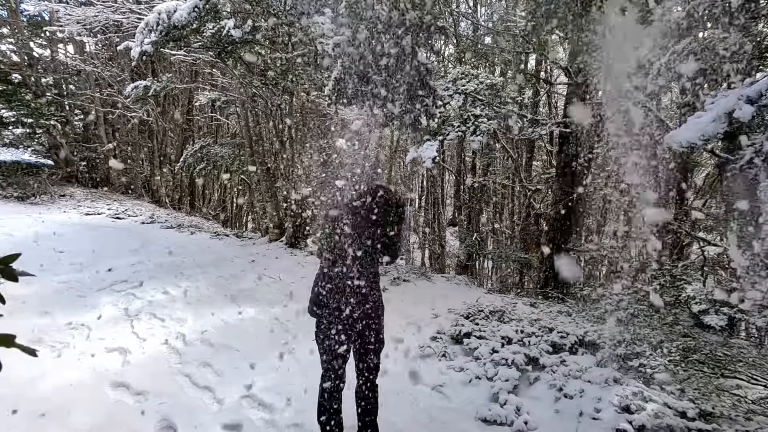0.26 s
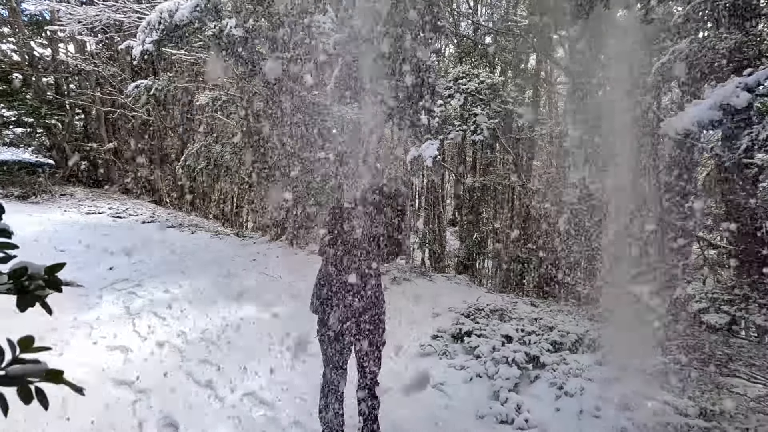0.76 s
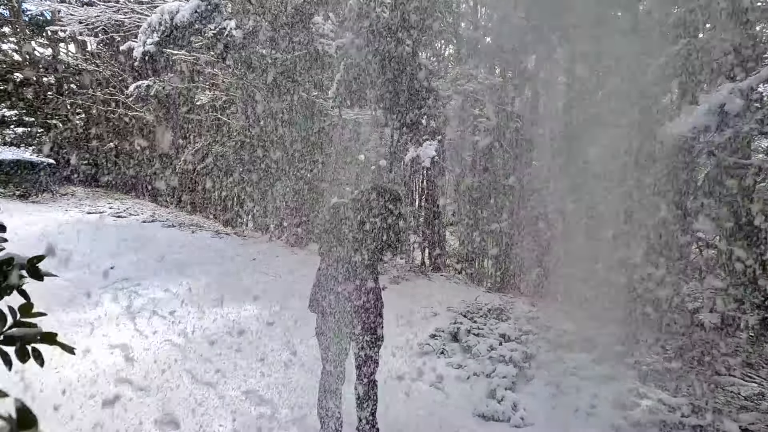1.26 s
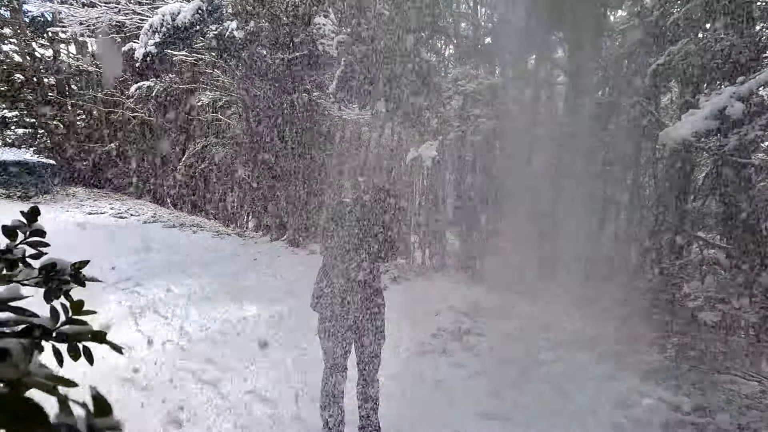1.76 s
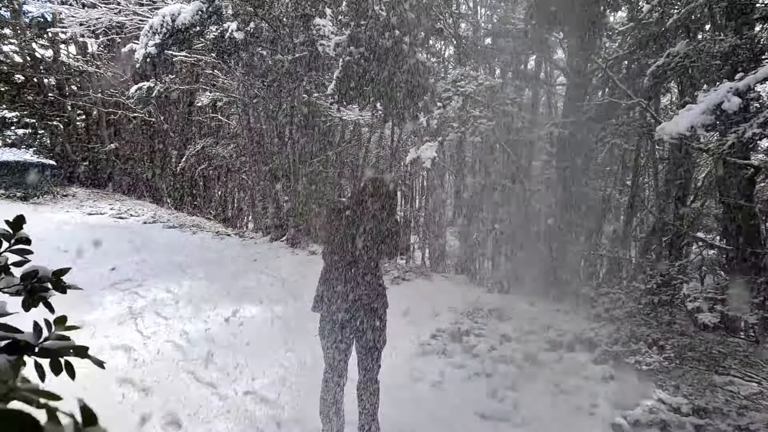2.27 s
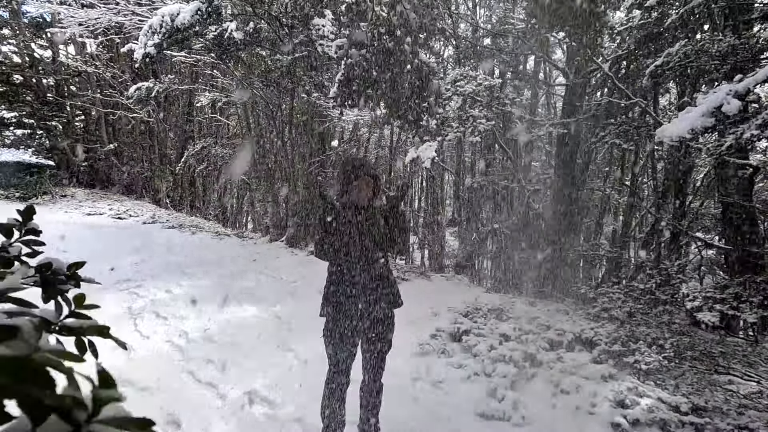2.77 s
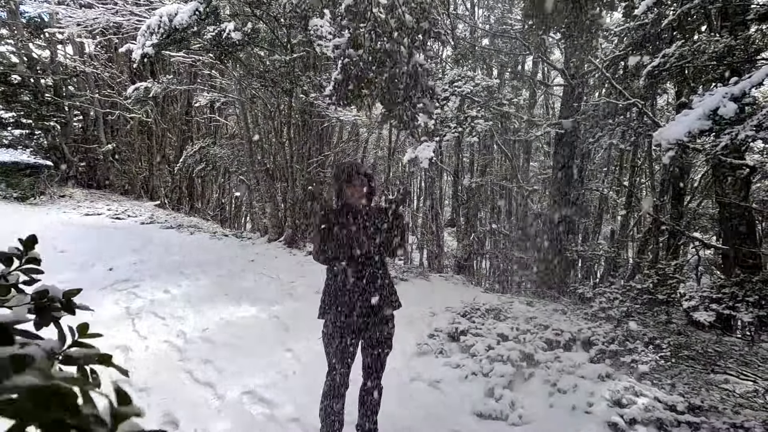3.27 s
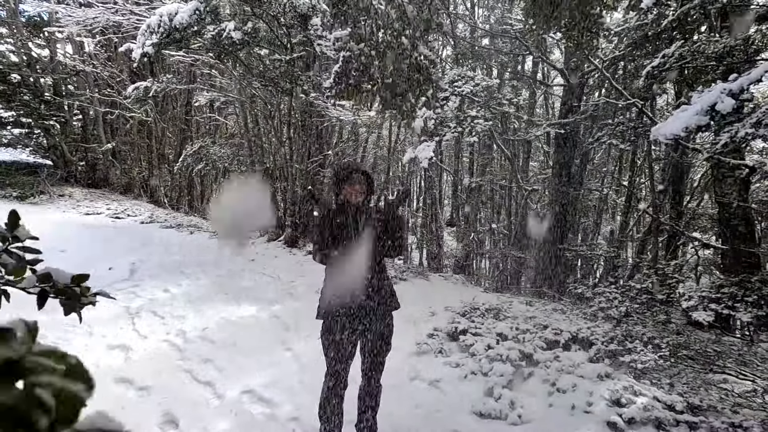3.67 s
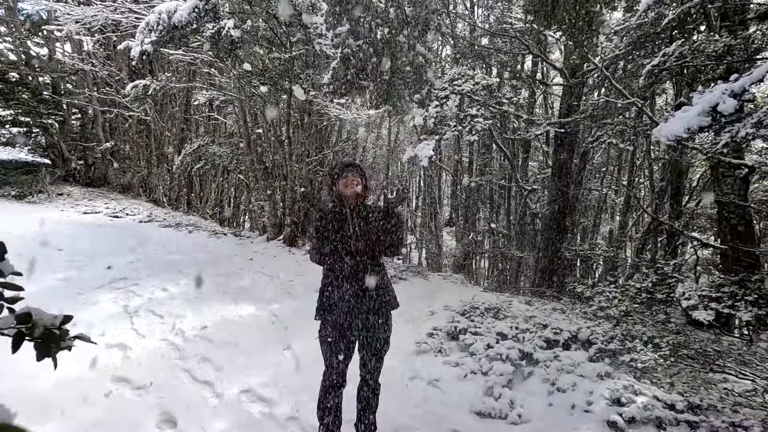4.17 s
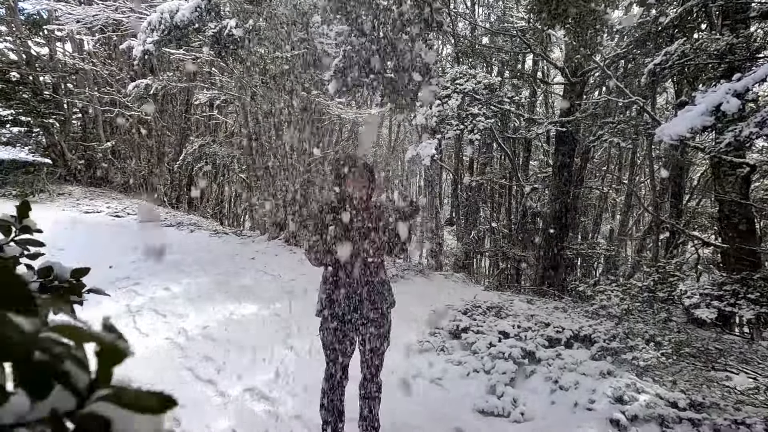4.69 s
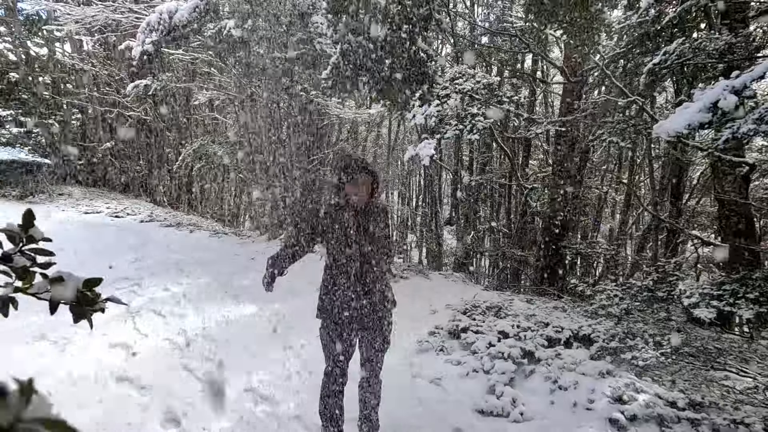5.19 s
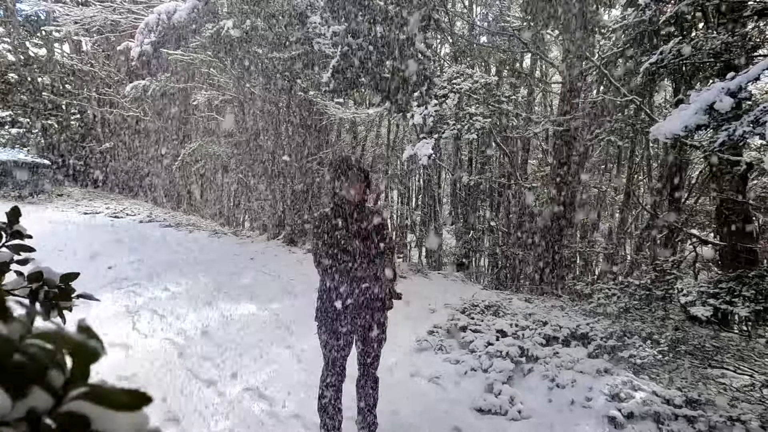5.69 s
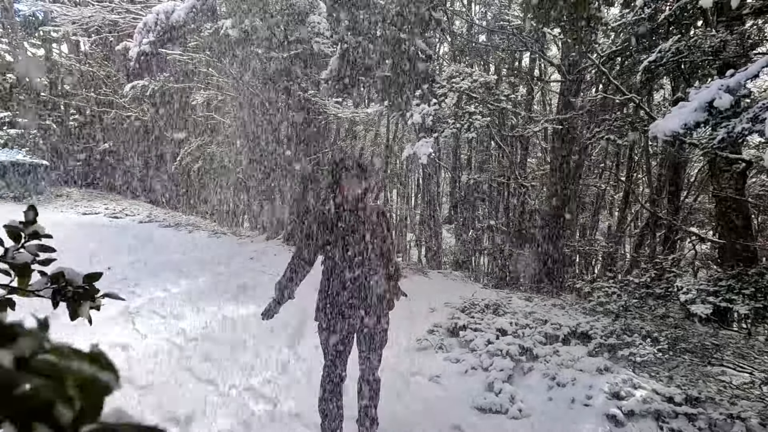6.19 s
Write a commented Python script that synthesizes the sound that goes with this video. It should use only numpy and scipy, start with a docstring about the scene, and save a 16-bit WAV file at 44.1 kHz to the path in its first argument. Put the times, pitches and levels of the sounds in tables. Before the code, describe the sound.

Loose snow slides from laden trees in a quiet forest around a handheld camera. A steady, wide, grainy hiss runs throughout, with faint crackle and dull drumming on the snow cover. Fine grains patter on the camera, a bright icy tick stands out early, powder swishes past, and soft clumps pat down. Later the fall thickens, ending with swishes and two crunchy bursts close by.

```python
"""Snow sliding off laden trees in a forest

Snow showers down around a hand-held camera. Countless crumbs on twigs and ground are random impulse trains,
coloured into a hiss, dry snaps and a dull drumming; powder swishes down in short swells of dense impacts.
Icy grains tick by exciting the casing's resonances, soft clumps pat and burst as damped, band-limited noise,
and the falling snow pushes air over the microphone ports as a low rumble and single pressure swings."""
import sys
import numpy as np
from scipy import signal
from scipy.fft import rfft, irfft, next_fast_len
from scipy.io import wavfile
from scipy.ndimage import uniform_filter1d, map_coordinates

SR = 44100
rng = np.random.default_rng(int(sys.argv[2]) if len(sys.argv) > 2 else 0)


def file_out(sig):
    """Save sig as 16-bit WAV at sys.argv[1]."""
    # one column per channel
    cols = np.atleast_2d(sig).T
    # limit, then scale
    lim = np.clip(cols, -1, 1)
    pcm = np.round(lim * 32767).astype(np.int16)
    wavfile.write(sys.argv[1], SR, pcm)


N = 284312

# Spectrum of snow crumbs striking twigs and snow. Each row: frequency in Hz, relative density in dB per Hz.
CRUMB_SPECTRUM = [(500, -18), (700, -11), (860, -12.5), (1050, -1), (1380, 0.5), (1800, 0), (2500, 0),
                  (3400, 0.5), (4600, -2), (6200, -2.5), (7700, -2), (9000, -9), (10500, -15), (12000, -13),
                  (15800, -33)]


def amp(db):
    """Decibels are logarithmic: 20 dB make a tenfold amplitude gain."""
    return 10 ** (np.asarray(db) / 20)


def unit(x):
    """Normalisation by the root of the mean power, to rms 1."""
    return x / np.sqrt(np.mean(x ** 2) + 1e-20)


def along(points, hz):
    """Interpolation of (Hz, value) points on a logarithmic frequency axis."""
    f, v = np.transpose(points)
    return np.interp(np.log(hz + 1), np.log(f + 1), v)


def curves(rows):
    """Linear interpolation in time: one value per sample for each column after the seconds."""
    s, *columns = np.transpose(rows)
    return [np.interp(np.arange(N) / SR, s, column) for column in columns]


def wobble(rate):
    """Slow random fluctuation: a smooth curve through `rate` random knots a second."""
    knots = rng.standard_normal(int(N * rate / SR) + 4)
    return map_coordinates(knots, [np.arange(N) * rate / SR])


def filtered(x, response):
    """Linear filtering: the spectrum of x times a complex response of frequency."""
    n = x.shape[-1]
    m = next_fast_len(n + 4096)  # zero padding leaves room for the ringing
    return irfft(rfft(x, m) * response(np.fft.rfftfreq(m, 1 / SR)), m)[..., :n]


def resonance(f, hz, width):
    """Response of one damped oscillator, causal and of gain 1 at its pitch."""
    return 1j * f * width / (hz * hz - f * f + 1j * f * width)


def casing(f):
    """Modal sum: the shell and ports ring briefly, and the stiff shell passes little below its first mode."""
    # Modes of the casing. Each row: frequency in Hz, bandwidth in Hz, relative level in dB.
    mode_table = [(3030, 610, -7.5), (5560, 940, -3), (7470, 1090, 0.5), (11200, 1460, -12.5),
                  (11880, 560, -6)]
    modes = 0
    for k, (hz, width, db) in enumerate(mode_table):
        modes = modes + (-1) ** k * amp(db) * resonance(f, hz, width)  # neighbours in opposite phase
    return modes * amp(along([(1500, -9), (2400, -6), (3100, 0)], f))


def pan(lean_db):
    """Constant-power panning: left and right gains for a left-right level difference in dB."""
    gains = amp(np.array([np.atleast_1d(lean_db), -np.atleast_1d(lean_db)]) / 2)
    return gains / np.sqrt(np.mean(gains ** 2, axis=0))


def right_port(f, edge_hz=8800):
    """Low-pass response of the ports: the left passes all the treble, the right rolls off."""
    return np.array([np.ones_like(f), 1 / np.sqrt(1 + (f / edge_hz) ** 12)])


def add(out, s, x):
    """Superposition: mix x into out from time s on."""
    i = max(round(s * SR), 0)
    out[:, i:i + x.shape[1]] += x[:, :max(N - i, 0)]


def impacts(rate, spread_db, life):
    """Random impulse trains, two unrelated: each impact is a decaying noise burst of log-normal size; rms 1."""
    sizes = amp(spread_db * np.clip(rng.standard_normal((2, N)), -2.5, 2.5))
    strikes = (rng.random((2, N)) < rate / SR) * sizes ** 2
    # the amplitude falls to 1/e within `life` seconds, so the energy falls twice as fast
    energy = signal.lfilter([1], [1, -np.exp(-2 / (life * SR))], strikes)
    return unit(np.sqrt(energy) * rng.standard_normal((2, N)))


def spread(pair, spectrum):
    """Interchannel coherence: colour two unrelated signals and blend them into a wide stereo field of rms 1."""
    # Likeness of the ports. Each row: frequency in Hz, left-right correlation before the level lean.
    likeness = [(100, 0.74), (500, 0.51), (1300, 0.65), (3000, 0.52), (7000, 0.8), (12000, 0.56)]
    # The right port is duller. Each row: frequency in Hz, left-right level difference in dB.
    port_lean = [(200, -4), (700, 1.5), (1300, 2.5), (2400, 2), (4400, 1.5), (8000, 1), (10000, 8.5),
                 (12000, 14)]

    def mid_side(f):
        turn = np.arccos(np.clip(along(likeness, f), -1, 1)) / 2
        return amp(along(spectrum, f)) * np.array([np.cos(turn), np.sin(turn)])

    mid, side = filtered(pair, mid_side)
    stereo = np.array([mid + side, mid - side])
    return unit(filtered(stereo, lambda f: pan(along(port_lean, f))))


def patchy(pair, depth_db):
    """Time-frequency modulation: smooth random gain patches give each gush its own colour."""
    z = signal.stft(pair, nperseg=512)[2]
    field = rng.standard_normal(z.shape[1:])
    field = uniform_filter1d(field, size=24, axis=0)  # over frequency bins
    field = uniform_filter1d(field, size=8, axis=1)  # over time frames
    return signal.istft(z * amp(depth_db * unit(field)), nperseg=512)[1][:, :N]


def air():
    """Pseudo-sound of moving air: a gusty draught rumbles on the ports, each puff swings from suction to pressure."""
    # Air dragged along by the falling snow. Each row: time in seconds, relative level in dB.
    draught = [(0.0, -52), (0.97, -61), (1.11, -56.5), (1.56, -66), (1.98, -51.5), (2.48, -60.5),
               (3.95, -56), (4.63, -54.5), (5.19, -56), (5.66, -50), (6.05, -62), (6.45, -50)]
    # Rumble of the draught. Each row: frequency in Hz, relative density in dB per Hz.
    rumble_spectrum = [(4, -67), (12, 9.5), (22, -17), (40, -16.5), (70, -33.5), (140, -58), (400, -90)]
    # Air pushed over the ports. Each row: time of the swing in seconds, relative level in dB, swing rate in Hz.
    puffs = [(0.651, -37, 21.7), (0.98, -34.5, 25.5), (2.071, -46.5, 30.2), (3.755, -39, 22.6),
             (3.96, -39.5, 40), (4.389, -38, 55), (4.453, -37, 32), (4.92, -29.5, 48.2)]
    gain_db, eddy_db = 6.5, 2  # rumble over the draught's level; its random swells
    draught_db, = curves(draught)
    rumble = spread(rng.standard_normal((2, N)), rumble_spectrum)
    out = rumble * amp(draught_db + gain_db + eddy_db * wobble(6))
    port_delay_s = np.array([[0], [0.001]])  # the air reaches the right port later
    for s, db, hz in puffs:
        u = 2 * np.pi * hz * (np.arange(N) / SR - s - port_delay_s)
        out += amp(db + 6) * u / (1 + u * u / 6) ** 3 * pan(-4.5)
    return out


def drumming(fall_db):
    """Power addition, in dB: the drumming on the ground follows the shower, and each slump swells over it."""
    # Heavy loads slumping onto the ground further off.
    # Each row: time of the peak in seconds, level in dB, half length in seconds.
    slumps = [(1.843, -68, 0.056), (2.736, -67, 0.1), (4.277, -72, 0.3), (5.318, -56.5, 0.025),
              (5.836, -60.5, 0.062)]
    ground_db, grows = -71, 0.26  # level at the shower's mean strength; dB per dB of shower
    t = np.arange(N) / SR
    power = amp(ground_db + grows * (fall_db - np.mean(fall_db))) ** 2
    for s, db, half in slumps:
        power = power + amp(db) ** 2 * np.exp(-((t - s) / half) ** 2)
    return 10 * np.log10(power)


def shower(hiss_db, ground_db):
    """Superposed impacts: far crumbs merge into a hiss, nearer ones stay grainy, heavier ones drum on the snow."""
    # Dull drumming on the snow cover. Each row: frequency in Hz, relative density in dB per Hz.
    ground_spectrum = [(55, -29), (115, -8), (165, 3), (260, -1), (400, -4), (520, -1), (850, -7.5),
                       (1300, -32), (2200, -67)]
    far = rng.standard_normal((2, N))
    near = impacts(rate=1200, spread_db=6.5, life=0.0026)
    crumbs = patchy(far + amp(-1.0) * near, depth_db=1.0)
    hiss = spread(crumbs, CRUMB_SPECTRUM) * amp(hiss_db + 0.51 * wobble(25.45))
    lumps = patchy(impacts(rate=300, spread_db=2, life=0.0028), depth_db=1.0)
    return hiss + spread(lumps, ground_spectrum) * amp(ground_db)


def crackle(hiss_db):
    """Sparse short impulses: single crystals on the nearest twigs stand out of the hiss as tiny dry snaps."""
    snaps = impacts(rate=150, spread_db=5.5, life=0.00025)
    return spread(snaps, CRUMB_SPECTRUM) * amp(hiss_db - 14)


def sprays():
    """Amplitude envelope on dense impacts: a loose load of powder swells and runs out as a swish of grains."""
    # Loose powder pouring down nearby. Each row: time of the peak in seconds, level in dB,
    # Gaussian rise time in seconds, relative left-right lean in dB, treble tilt in dB per octave (1 to 10 kHz).
    powder_loads = [(0.826, -50.5, 0.02, 1, -1), (1.371, -44.5, 0.019, -6, 0.5),
                    (1.68, -48.5, 0.019, -3, 1), (2.805, -47.5, 0.018, -13, -2),
                    (4.137, -48, 0.011, 18, 12), (4.34, -55.5, 0.087, 1, -8.5),
                    (5.059, -41.5, 0.0057, 14, 8), (5.11, -51, 0.025, 10, 11), (5.166, -42, 0.013, 2, 1),
                    (5.704, -42, 0.015, -7, 4), (5.889, -42.5, 0.072, -6, -1)]
    fall_ratio = 0.57  # fall time over rise time
    out, t = np.zeros((2, N)), np.arange(-SR // 6, SR // 6) / SR
    powder = spread(impacts(rate=4400, spread_db=2.0, life=0.00064), CRUMB_SPECTRUM)
    for s, db, rise, lean_db, tilt_db in powder_loads:
        grains = powder[:, round(s * SR):][:, :len(t)]
        tilt = lambda f: amp(tilt_db * np.log2(np.clip(f, 1000, 10000) / 1000))
        grains = unit(filtered(grains, tilt))
        swell = np.exp(-(t / np.where(t < 0, rise, fall_ratio * rise)) ** 2 / 2)
        add(out, s + t[0], amp(db) * grains * swell * pan(lean_db + 3.5))
    return out


def loads():
    """Power addition, in dB: each load drifting over the camera sets in at once, holds and thins out."""
    # Loads over the camera. Each row: start in seconds, length in seconds, relative patter level in dB.
    drifts = [(0.148, 1.15, -61.5), (3.648, 0.7, -58.5), (5, 0.32, -54.5), (5.95, 0.12, -62)]
    attack_s, fade_db_per_s = 0.023, 27
    t = np.arange(N) / SR
    power = amp(-66) ** 2  # stray grains never stop
    for s, length, db in drifts:
        arrived = np.clip((t - s) / attack_s, 0, 1)
        thinning_db = fade_db_per_s * np.maximum(t - s - length, 0)
        power = power + (arrived * amp(db - thinning_db)) ** 2
    return 10 * np.log10(power)


def patter(patter_db):
    """Impact excitation of the casing: fine grains pepper the camera, and a thicker fall brings more of them."""
    rate_per_s, size_spread_db, grows = 130, 10.5, 0.4  # rate at the mean load; level grows in dB per dB of load
    thick_db = patter_db - np.mean(patter_db)
    near, apart = impacts(rate=rate_per_s * amp(thick_db), spread_db=size_spread_db, life=0.0039)
    ports = np.array([near, 0.28 * near + 1.2 * apart]) * pan(10)
    fine = lambda f: amp(along([(5000, -1.5), (8500, -4.0), (12000, 1), (15500, 2)], f))
    grains = unit(filtered(ports, lambda f: casing(f) * fine(f) * right_port(f)))
    return grains * amp(np.mean(patter_db) + grows * thick_db + 2)


def pat(db, hz, width, length, lean_db):
    """Damped forced response: one push of a clump's weight and a quick run of crumbling drive a broad resonance."""
    t = np.arange(SR // 8) / SR
    own = rng.standard_normal((3, len(t)))
    push_and_crumbling = 0.76 + own[2] + 0.26 * own[:2]  # mostly shared by both ports
    force = push_and_crumbling * (1 - np.exp(-t / 0.0002)) * np.exp(-(t / length) ** 1.05)
    soft = lambda f: 1 / np.sqrt(1 + (f / 7800) ** 8)  # loose snow is too soft to excite the top treble
    sound = filtered(force, lambda f: resonance(f, hz, width) ** 2 * soft(f))
    return amp(db + 0.9) * unit(sound) * np.sqrt(length / t[-1]) * pan(lean_db)


def clumps():
    """Superposed damped bands: soft clumps give one pat; firmer ones crack, crunch and thud, shaded in the treble."""
    # Soft pats: clumps that land whole, and dull low thuds that come with some of the air puffs. # Each row:
    # start in seconds, relative level in dB, pitch in Hz, left-right difference in dB.
    soft_pats = [(0.906, -55, 170, -9), (1.008, -52.5, 112, 3), (2.062, -59, 150, 6),
                 (2.325, -50.5, 174, -7), (2.636, -58.5, 145, 1), (3.035, -63, 220, -4),
                 (3.401, -40, 1780, 23), (3.7058, -43, 1190, 5), (3.768, -42.5, 1320, 6),
                 (3.981, -61.5, 112, -7), (4.382, -54, 143, -14), (4.456, -60, 135, 15),
                 (5.211, -52.5, 269, -9)]
    # Clumps that burst close by. Each row: start in seconds, relative levels of thud, crunch and crack in dB,
    # thud pitch in Hz, crunch pitch in Hz, break-up time in seconds, left-right difference of the crunch in dB.
    firm_clumps = [(0.4721, -65, -38, -39, 330, 1650, 0.0072, 10.5),
                   (0.997, -41.5, -43, -40.5, 290, 706, 0.004, 7),
                   (2.0, -66, -46.5, -45.5, 400, 1690, 0.0066, 7),
                   (3.8678, -43, -34.5, -51, 473, 950, 0.00038, 5),
                   (5.323, -34.5, -31.5, -27, 240, 1260, 0.0025, -4.5),
                   (5.778, -44, -34.5, -42.5, 326, 1210, 0.0074, 0)]
    pat_cycles = 3.5  # a pat's decay time in cycles of its pitch
    pat_width, crunch_width, crack_width, thud_width = 0.59, 0.82, 0.81, 1.37  # bandwidths over pitch
    crack_ratio = 2.9  # crack pitch over crunch pitch
    settle_s, thud_lag_s = 0.02, 0.001  # settling of a clump's weight; the thud's lag
    out = np.zeros((2, N))
    for s, db, hz, lean_db in soft_pats:
        add(out, s, pat(db, hz, pat_width * hz, pat_cycles / hz, lean_db))
    for s, thud_db, crunch_db, crack_db, thud_hz, crunch_hz, length, lean_db in firm_clumps:
        crack_hz = crack_ratio * crunch_hz
        thud_s = np.sqrt(length * settle_s)
        add(out, s, pat(crack_db, crack_hz, crack_width * crack_hz, 0.92 * length, 1.2 * lean_db))
        add(out, s, pat(crunch_db, crunch_hz, crunch_width * crunch_hz, length, lean_db))
        add(out, s + thud_lag_s, pat(thud_db, thud_hz, thud_width * thud_hz, thud_s, lean_db=2.0))
    return out


def ticks():
    """Impulse excitation of modes: an icy grain strikes, shatters and rings the casing; harder ones are brighter."""
    # The hardest icy grains on the casing. Each row: start in seconds, relative level in dB,
    # left-right difference in dB (on top of the duller right port), relative treble over body in dB.
    icy_grains = [(0.3584, -44.5, -5, 4), (0.6755, -40.5, 1, 7), (0.7684, -37.5, 20, 22),
                  (1.438, -24, 11, 5.5), (2.0002, -37.5, 7, -8.5), (2.311, -32, 20, 12),
                  (4.5178, -42, 11, -3), (4.6241, -38.5, -8, -6), (4.6314, -38.5, 7, -8),
                  (4.6849, -41.5, -2, 3), (4.771, -40.5, -6, 16), (4.8123, -44, 0, -3), (4.837, -43, 4, 4),
                  (5.0502, -38.5, 11, 12), (5.138, -41, 9, 7), (5.1532, -36, 7, 27), (5.3996, -38, 5, -1),
                  (5.9712, -41, 8, 0), (6.2533, -45.5, 3, -6)]
    lead = 64  # samples of silence ahead of the strike
    out, t = np.zeros((2, N)), np.arange(1024) / SR
    decay = amp(-60 * t / 0.0035) + amp(-23 - 60 * t / 0.013)  # a quick fall and a weaker, slower tail
    shatter = (1 - np.exp(-t / 0.0003)) * decay
    for s, db, lean_db, bright_db in icy_grains:
        own = rng.standard_normal((3, len(t)))
        force = (own[2] + 0.86 * own[:2]) * shatter
        force[:, round(0.0005 * SR)] += 1.7  # the strike itself
        force = np.pad(force, ((0, 0), (lead, 0)))
        tilt = lambda f: amp((bright_db - 4) * along([(3500, -0.7), (7500, 0.3), (13000, 0.45)], f))
        ring = filtered(force, lambda f: casing(f) * tilt(f) * right_port(f))
        add(out, s - lead / SR, amp(db - 7.5) * unit(ring) * pan(lean_db))
    return out


def scene():
    """Common modulation: one shower strength drives hiss, crackle and drumming; the near sounds add to them."""
    # Strength of the whole shower, surging as branch after branch lets go.
    # Each row: time in seconds, strength in dB.
    shower_strength = [(0, -53.5), (0.3, -53), (1.3, -52), (1.5, -53.5), (2.02, -54.5), (2.25, -52.0),
                       (2.5, -53.5), (2.8, -51.5), (3.08, -54), (3.6, -53), (3.78, -50), (4.03, -52),
                       (4.3, -49.5), (4.52, -51.5), (5.1, -49.5), (5.68, -51), (6.15, -54), (6.45, -51)]
    fall_db, = curves(shower_strength)
    hiss_db = fall_db + 1.06
    background = air() + shower(hiss_db, drumming(fall_db)) + crackle(hiss_db)
    return background + sprays() + patter(loads()) + clumps() + ticks()


def record(dry):
    """Band limitation: the camera keeps nothing from 15850 Hz up."""
    return filtered(dry, lambda f: f < 15850)


dry = scene()
out = record(dry)
file_out(out)
```